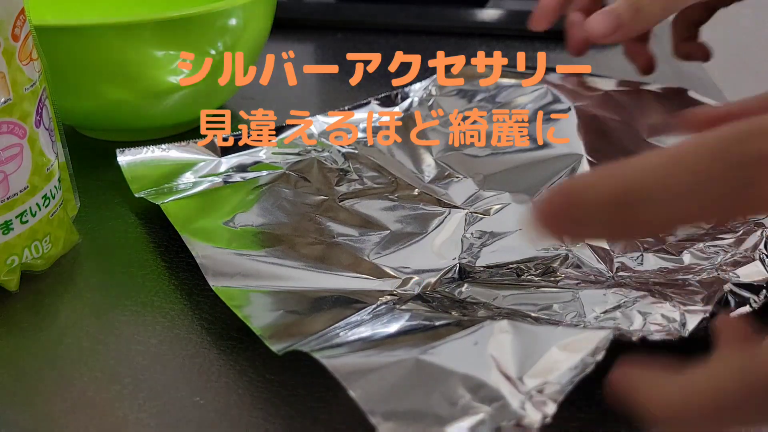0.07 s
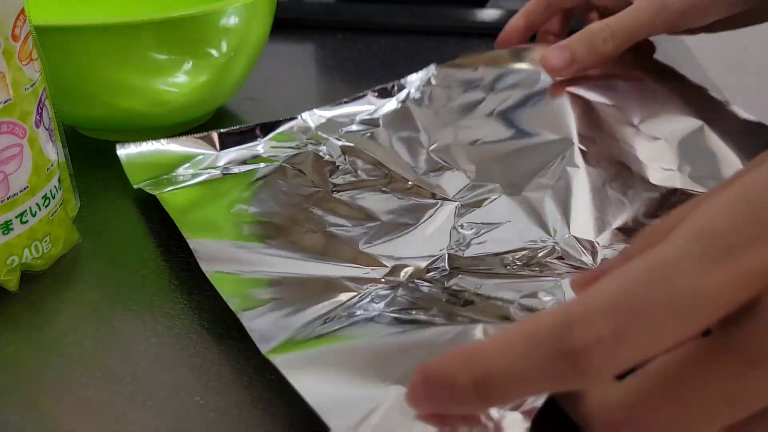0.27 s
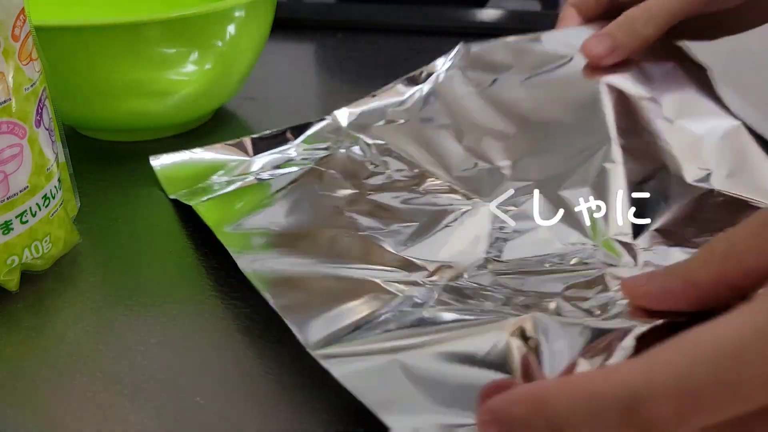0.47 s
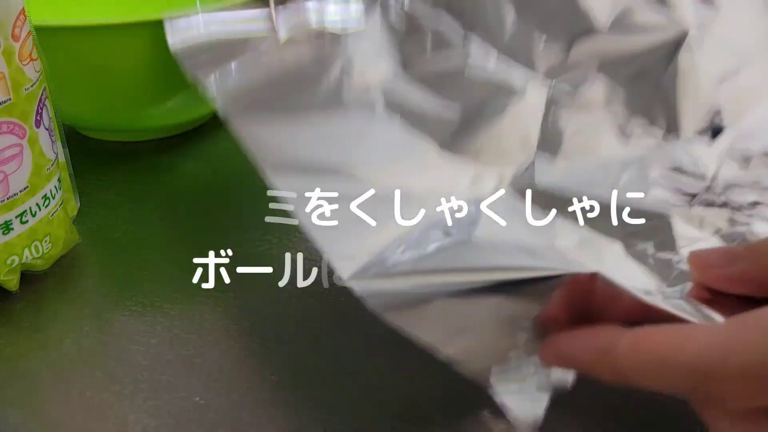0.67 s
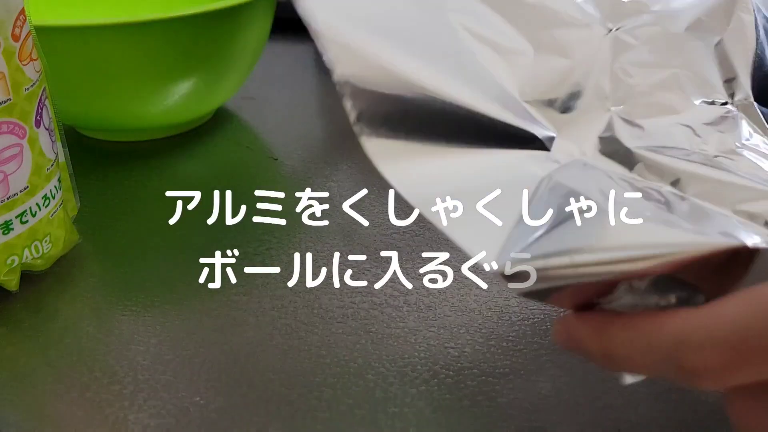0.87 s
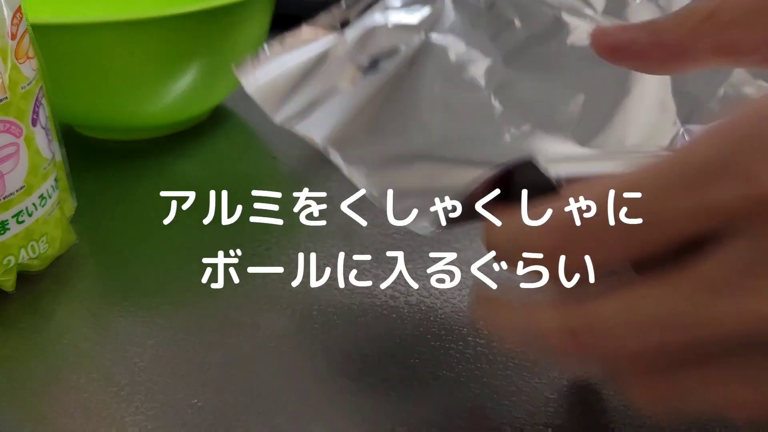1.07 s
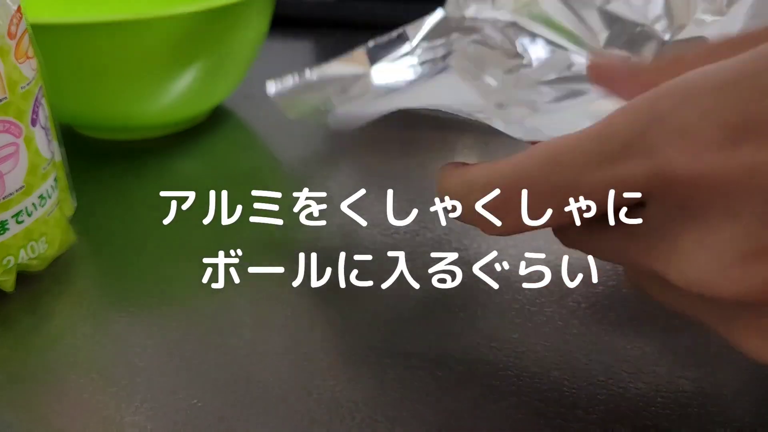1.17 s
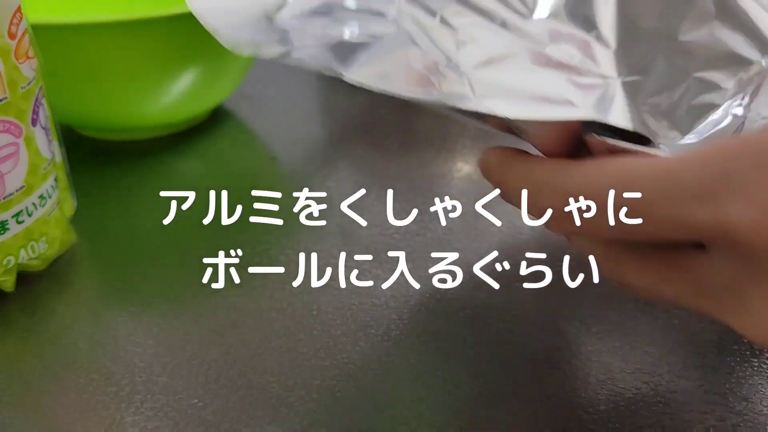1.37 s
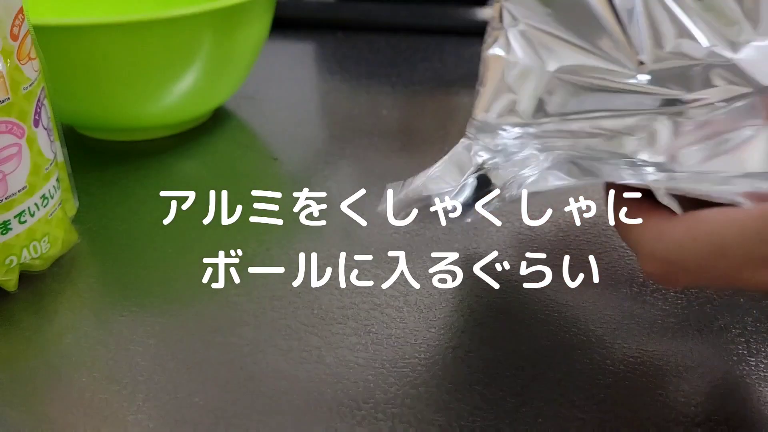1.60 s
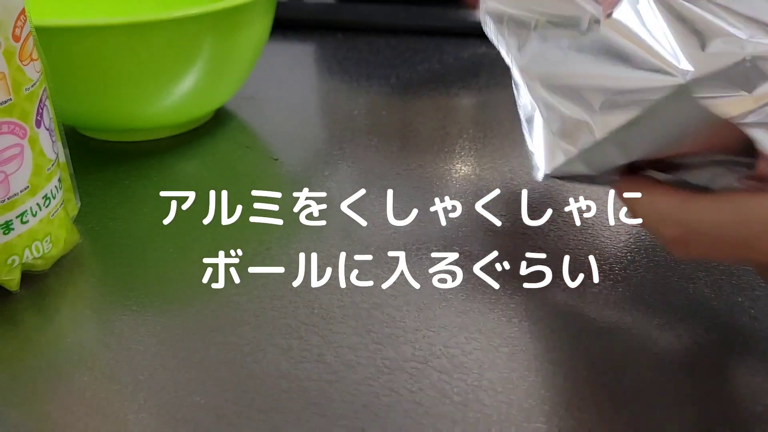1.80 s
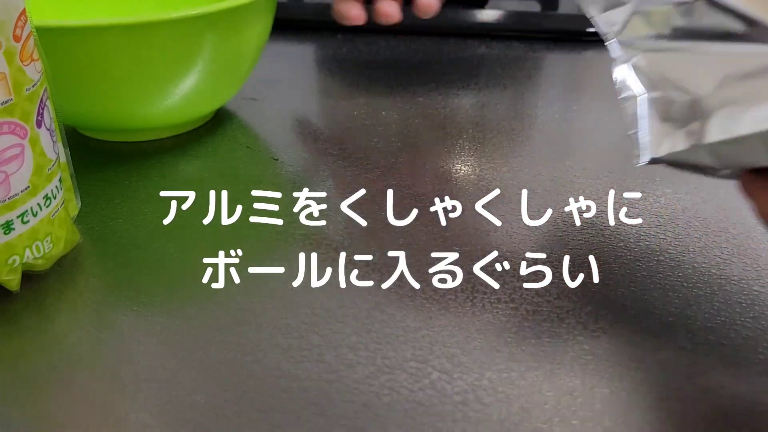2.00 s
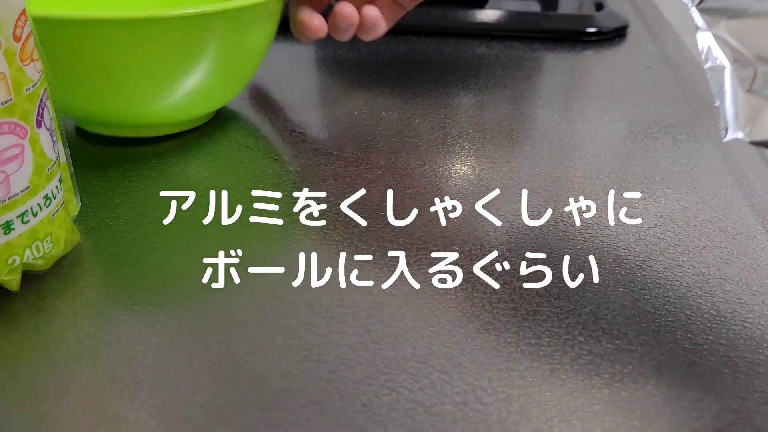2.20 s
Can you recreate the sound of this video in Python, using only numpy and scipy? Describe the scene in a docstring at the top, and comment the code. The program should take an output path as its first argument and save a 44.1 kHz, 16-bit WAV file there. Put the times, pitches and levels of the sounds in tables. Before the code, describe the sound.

Aluminium foil crinkles and crackles as hands crumple it in a quiet room.

```python
"""Crumpling aluminium foil

Two hands gather a sheet of foil, crumple it and lift it off a table in a small, quiet room.
Each squeeze sets off a swarm of tiny creases, single flat patches snap through louder, and the
whole sheet bends with a low flutter. The foil rings briefly and the room echoes. Underneath,
the table rumbles under the hands, ventilation blows and an appliance hums."""
import sys
import numpy as np
from scipy import signal
from scipy.fft import rfft, irfft
from scipy.io import wavfile
from scipy.ndimage import uniform_filter1d

SR = 44100
rng = np.random.default_rng(int(sys.argv[2]) if len(sys.argv) > 2 else 0)


def int16_out(signal):
    """Quantize to a 16-bit WAV file."""
    q = np.round(np.clip(np.atleast_2d(signal).T, -1, 1) * 32767)
    wavfile.write(sys.argv[1], SR, q.astype(np.int16))


N = 99225

# Tone of the ventilation: pitch_hz, gain_db
AIR_TONE = [(15, -50), (25, -16), (60, -13), (105, -6.5), (170, -16.5), (215, -6.5), (291, -6),
            (400, -10.5), (480, -15.5), (540, -16.5), (620, -16), (1060, -25.5), (1800, -25), (2400, -29),
            (3500, -30.5), (8000, -43.5), (15800, -47)]
# How alike the ventilation is on the left and right: pitch_hz, correlation
AIR_LIKENESS = [(40, 0.33), (130, 0.97), (280, 0.62), (600, 0.083), (3000, 0.021)]
# Tones of the appliance: pitch_hz, level_db
HUM_TONES = [(120, -60), (292, -61)]
# Time the room's echo takes to fade by 60 dB: pitch_hz, fade_s
ROOM_FADE = [(200, 0.11), (1000, 0.22), (3500, 0.33), (9000, 0.17), (16000, 0.12)]
# Hands shifting on the table: start_s, length_s, level_db
HAND_PUSHES = [(0.173, 0.058, -57), (.59, 0.082, -59), (0.807, 0.27, -49), (1.212, .17, -50),
               (1.504, 0.055, -50), (1.626, 0.29, -51.5), (1.97, 0.41, -61)]
# Tone of the table top: pitch_hz, gain_db
TABLE_TONE = [(20, -20), (45, -12), (75, 0), (105, 2), (119, 15), (140, -7.5), (190, -9), (400, -30)]
# How strongly the whole sheet bends: time_s, relative_level_db
BEND_LEVELS = [(.17, -69), (.21, -55.5), (.31, -57.5), (.38, -57), (.47, -59), (0.579, -58), (.65, -53),
               (.7, -76), (.8, -53), (.86, -47.5), (.93, -48), (.97, -42), (1.03, -60), (1.12, -55),
               (1.21, -64), (1.27, -48), (1.36, -59), (1.46, -62), (1.54, -48), (1.64, -67), (1.68, -44.5),
               (1.82, -51.5), (1.9, -62), (1.96, -70)]
# Tone of the bending: pitch_hz, gain_db
BEND_TONE = [(60, -26), (160, -7.5), (215, -1), (340, 1.5), (520, 0), (640, -4.5), (900, -5.5), (1600, -31),
             (5000, -57)]
# Notes the foil rings at, each fading by 60 dB: pitch_hz, gain_db, fade_s
FOIL_NOTES = [(1716, -22, 0.18), (1849, -22.5, 0.21), (2830, -24, 0.2), (3210, -22.5, 0.1),
              (5160, -24, 0.17)]
# Flat patches snapping through: start_s, level_db, pitch_hz, width_octaves, left_minus_right_db
PATCH_SNAPS = [(.1795, -49.5, 5000, 0.52, 1), (0.2368, -33, 5700, 0.69, 2), (.297, -43, 450, 0.56, 8),
               (.3325, -29, 3600, 0.78, 2.5), (0.4266, -32.5, 2160, 1.13, 1), (.537, -27, 5140, 1.3, -1.5),
               (.554, -49, 6000, 1.5, 0), (.556, -37, 1750, 0.17, -9), (0.5778, -32, 2410, 0.59, 0),
               (0.641, -35.5, 1800, 2, 4), (.646, -27, 2600, 1.5, 1), (.6462, -40, 865, 0.43, -3),
               (0.7153, -30, 3600, 1.4, -3), (0.749, -29, 2800, 1.5, -3), (.9205, -27.5, 10400, 0.48, 4),
               (0.9228, -28, 9000, .8, -5), (.9642, -28.5, 745, 0.41, -1), (0.965, -38, 1600, 0.49, -13),
               (0.9724, -28, 3800, 1.2, -2), (0.997, -31, 1820, 1.8, -3), (1.28, -45, 3000, 1.1, 0),
               (1.294, -33, 1930, 2, -14), (1.315, -24, 4500, 3.1, 1), (1.362, -30, 6000, 2.9, -9),
               (1.3753, -35, 2920, 1.2, 5), (1.381, -40, 1140, 1.2, -3), (1.406, -44, 4000, 1.5, 0),
               (1.449, -30.5, 12700, .5, -3), (1.649, -27.5, 8000, 1.3, -1), (1.665, -39, 450, 0.57, 3),
               (1.688, -33, 8000, 1.2, -3), (1.692, -39, 435, 0.4, 2.5), (1.7518, -40, 7000, 1.3, 4),
               (1.8028, -28.5, 8000, 0.41, 0), (1.8557, -25.5, 5000, 2, -4), (1.903, -30.5, 8300, 0.81, 0),
               (1.9803, -29, 9700, 0.78, -2.5), (1.984, -34, 5500, 0.79, 0), (1.996, -39, 6500, 0.9, -1),
               (2.084, -51.5, 5500, 0.9, -12), (2.09, -56, 5000, 1.3, 14), (2.1844, -54.5, 3000, 0.47, -1),
               (2.217, -45.5, 2840, 0.17, -3), (2.2165, -46, 10000, 0.99, -5)]
# Squeezes of the hands: start_s, rise_s, hold_s, relative_level_db, brightness_db_per_octave
HAND_SQUEEZES = [(0, 0.0025, 0.04, -64, -7), (0.18, 0.031, 0.046, -35, 0.5),
                 (0.254, 0.0075, 0.053, -41.5, -1), (0.329, 0.0019, 0.022, -27.5, 0),
                 (0.368, 0.01, 0.058, -32.5, 0.5), (0.431, 0.049, 0.042, -33, -1),
                 (0.544, 0.005, 0.072, -33, -1.5), (0.646, 0.0053, 0.041, -31.5, 0.5),
                 (0.706, 0.019, .01, -22.5, 1.5), (.76, .005, 0.024, -28, 1.5),
                 (0.796, 0.024, 0.054, -32.5, -2.5), (0.833, 0.034, 0.016, -22.5, 1.5),
                 (0.89, 0.036, 0.08, -27.5, -.5), (1.014, 0.008, .033, -29.5, 1),
                 (1.069, 0.027, 0.015, -33, -1), (1.128, 0.0098, 0.0041, -24, 1),
                 (1.149, 0.0043, 0.011, -21.5, 1), (1.18, 0.0037, 0.014, -30, -0.5),
                 (1.223, 0.011, 0.027, -28, -2.5), (1.254, 0.0097, 0.054, -28.5, -2),
                 (1.324, 0.009, 0.014, -30.5, 0), (1.357, 0.0037, .038, -25.5, -0.5),
                 (1.437, 0.018, 0.039, -38.5, -1), (1.478, 0.017, 0.056, -31.5, -.5),
                 (1.562, 0.0089, 0.047, -30, -0.5), (1.644, 0.0017, 0.0044, -34.5, 0),
                 (1.686, 0.0013, .012, -26.5, 1), (1.707, 0.014, .035, -25.5, 0.5),
                 (1.763, 0.025, 0.039, -29, -1), (1.825, .008, 0.041, -33, -1),
                 (1.871, .005, 0.019, -39.5, -3.5)]
# Tone of the creases: pitch_hz, gain_db
CREASE_TONE = [(250, -24), (500, 0), (680, -6.5), (950, -3.5), (1750, -1.5), (2200, -3), (3150, 0.4),
               (4500, -0.9), (8900, 0.5), (10900, -2.5), (13300, 2.5), (15800, -2)]
# Balance between the two microphones: pitch_hz, left_minus_right_db
MIC_BALANCE = [(60, 0), (130, 0.5), (260, -3.5), (500, -2.5), (1500, -0.5), (4000, .5)]


def amp(db):
    """Turns decibels into a gain."""
    return 10 ** (np.asarray(db) / 20)


def unit_rms(x):
    """Scales a sound to an average (rms) level of 1."""
    return x / np.sqrt(np.mean(x ** 2) + 1e-20)


def unit_energy(x):
    """Scales each channel to an energy of 1."""
    return x / np.sqrt(np.sum(x ** 2, -1, keepdims=True) + 1e-20)


def look_up(table, hz):
    """Reads between a table's rows on a logarithmic pitch scale."""
    pitches, values = np.transpose(table)
    return np.interp(np.log(hz + 1), np.log(pitches + 1), values)


def add(mix, start_s, sound):
    """Mixes a stereo sound in at the given time."""
    part = mix[:, max(round(start_s * SR), 0):][:, :sound.shape[1]]
    part += sound[:, :part.shape[1]]


def shape_tone(x, table):
    """Turns each pitch up or down as a tone table says."""
    return irfft(rfft(x) * amp(look_up(table, np.fft.rfftfreq(N, 1 / SR))), N)


def resonate(x, hz, octaves):
    """A broad resonance favours pitches near hz; the result has an energy of 1."""
    pitches = abs(np.fft.fftfreq(x.shape[1], 1 / SR)) + 1
    log_gain = np.maximum(-0.5 * (np.log2(pitches / hz) / octaves) ** 2, -8)
    response = np.exp(np.conj(signal.hilbert(log_gain)))  # rings after a hit, not before
    return unit_energy(np.fft.ifft(np.fft.fft(x) * response).real)


def changing_echo(x, make_echo, step_s=0.06):
    """Each overlapping slice of sound gets a new echo, as the foil changes shape and place."""
    out, hop = np.zeros((2, N)), round(step_s * SR)
    padded = np.pad(x, ((0, 0), (0, 2 * hop)))
    window = np.sin(np.pi * np.arange(2 * hop) / (2 * hop))
    for at in range(0, N, hop):
        piece = padded[:, at:at + 2 * hop] * window
        add(out, at / SR, signal.fftconvolve(piece, make_echo(), axes=1))
    return out


def ventilation(level_db=-52):
    """Moving air makes a low, steady rush."""
    left, other = rfft(rng.standard_normal((2, N)))
    alike = look_up(AIR_LIKENESS, np.fft.rfftfreq(N, 1 / SR))
    right = alike * left + np.sqrt(1 - alike ** 2) * other
    return amp(level_db) * unit_rms(shape_tone(irfft([left, right], N), AIR_TONE))


def appliance_hum(waver_depth=0.15, drift_radians=0.48):
    """An appliance hums with low tones that waver a little in level and pitch."""
    t, out = np.arange(N) / SR, np.zeros(N)
    for hz, db in HUM_TONES:
        noise = rng.standard_normal((2, N))
        waver, drift = unit_rms(uniform_filter1d(uniform_filter1d(noise, 4000), 4000))
        tone = np.sin(2 * np.pi * hz * t + drift_radians * drift)
        out += amp(db) * unit_rms((1 + waver_depth * waver) * tone)
    return out


def room_echo(x, gain_db=-3.5, rise_s=0.0051, samples=12000):
    """The small room answers with a short wash of sound that lasts longest near 3500 Hz."""
    def tail():
        hz, t, spectrum = signal.stft(rng.standard_normal((2, samples)), SR, nperseg=256)
        fade = amp(-60 * t / look_up(ROOM_FADE, hz)[:, None])
        echo = signal.istft(spectrum * fade, SR, nperseg=256)[1]
        rise = np.minimum(np.arange(echo.shape[1]) / SR / rise_s, 1)
        return unit_energy(echo * rise)
    return amp(gain_db) * changing_echo(x, tail)


def table_rumble():
    """The table top rumbles dully as the hands shift on it."""
    t = np.arange(N) / SR
    push = sum(amp(db) * np.sin(np.pi * np.clip((t - start_s) / length_s, 0, 1))
               for start_s, length_s, db in HAND_PUSHES)
    return push * unit_rms(shape_tone(rng.standard_normal(N), TABLE_TONE))


def foil_bending(knocks_per_s=600, gain_db=-2.5, shared=0.78):
    """Wide panels give soft, low knocks as the sheet bends and drags on the table."""
    times, levels = np.transpose(BEND_LEVELS)
    level_db = np.interp(np.arange(N) / SR, times, levels, left=-100, right=-100)
    knocks = (rng.random((3, N)) < knocks_per_s / SR) * rng.standard_normal((3, N))
    stereo = np.sqrt(shared) * knocks[2] + np.sqrt(1 - shared) * knocks[:2]
    return unit_rms(shape_tone(stereo, BEND_TONE)) * amp(gain_db + level_db)


def foil_ring(x, wash_fade_s=0.054, wash_db=-0.5, samples=6000):
    """Every buckle spreads through the foil: a short, noisy wash and a few longer notes."""
    t = np.arange(samples) / SR

    def ring():
        wash = rng.standard_normal((2, samples)) * amp(-60 * t / wash_fade_s)
        out = amp(wash_db) * unit_energy(wash)
        for hz, db, fade_s in FOIL_NOTES:
            note = np.sin(2 * np.pi * (hz * t + rng.random((2, 1))))
            out += amp(db) * unit_energy(note * amp(-60 * t / fade_s))
        return out
    return changing_echo(x, ring)


def one_snap(hz, octaves, decay_s=0.0027, pulse=0.28, alike_below_hz=2470, samples=1024):
    """A flat patch flips: a sharp pulse and a burst of noise that dies within milliseconds."""
    fade = np.exp(-np.arange(samples) / SR / decay_s)
    shared = np.exp(-hz / alike_below_hz)  # low snaps reach both microphones alike
    noise = rng.standard_normal((3, samples))
    burst = unit_energy((np.sqrt(1 - shared) * noise[:2] + np.sqrt(shared) * noise[2]) * fade)
    burst[0, 0] += pulse
    burst[1, 2] += pulse  # two samples later on the right
    toneless = irfft(np.exp(1j * np.angle(rfft(burst))), samples)  # all pitches equally strong
    return resonate(toneless * np.sqrt(fade), hz, octaves)


def foil_snaps(body_s=0.0017):
    """Larger patches flip one at a time, each with the energy of its level held for body_s."""
    out = np.zeros((2, N))
    for start_s, db, hz, octaves, side_db in PATCH_SNAPS:
        gains = amp([[db + side_db / 2], [db - side_db / 2]]) * np.sqrt(body_s * SR)
        add(out, start_s, gains * one_snap(hz, octaves))
    return out


def foil_creases(creases_per_s=3600, decay_s=0.00065, release_s=0.017, spread_db=2, gain_db=-4.5):
    """Each squeeze buckles the foil in a swarm of tiny clicks; tight squeezes sound brighter."""
    t, out = np.arange(N) / SR, np.zeros((2, N))
    squeezes = []
    for start_s, rise_s, hold_s, _, _ in HAND_SQUEEZES:
        grip = np.clip((t - start_s) / rise_s, 0, 1)
        let_go = np.exp(-np.maximum(t - start_s - rise_s - hold_s, 0) / release_s)
        squeezes.append(grip * let_go)
    level_db, brightness = np.transpose(HAND_SQUEEZES)[3:]
    pitches = np.geomspace(800, 18000, 16)
    for hz in pitches:
        chance = np.sqrt(hz) / np.sqrt(pitches).sum() * creases_per_s / SR
        clicks = (rng.random(N) < chance) * amp(spread_db * np.minimum(rng.exponential(1, N), 3))
        # Each click gets a quickly fading tail.
        click_power = signal.lfilter([1], [1, -np.exp(-2 / (decay_s * SR))], clicks ** 2 + 1e-12)
        strengths = amp(level_db + brightness * np.log2(hz / 7000))  # tips the tone around 7000 Hz
        effort = np.sqrt(strengths ** 2 @ np.square(squeezes) * hz / pitches.sum())
        bursts = unit_rms(np.sqrt(click_power)) * effort * rng.standard_normal((2, N))
        ring = resonate(signal.unit_impulse(512)[None], hz, octaves=0.92)
        out += signal.fftconvolve(bursts, ring, axes=1)[:, :N]
    return amp(gain_db) * shape_tone(out, CREASE_TONE)


def scene():
    """The foil, its ring and its echo, over the table and the background."""
    buckles = foil_creases() + foil_snaps()
    direct = buckles + foil_bending()
    foil = direct + foil_ring(buckles) + room_echo(direct)
    return foil + table_rumble() + ventilation() + appliance_hum()


def record(dry, cutoff_hz=15900):
    """The right microphone hears more of the lower middle pitches; the highest treble is cut."""
    left = shape_tone(dry[0], np.multiply(MIC_BALANCE, [1, 0.5]))
    right = shape_tone(dry[1], np.multiply(MIC_BALANCE, [1, -0.5]))
    treble_cut = signal.firwin(511, cutoff_hz, window=("kaiser", 9), fs=SR)
    return signal.oaconvolve(np.array([left, right]), treble_cut[None], "same")


dry = scene()
out = record(dry)
int16_out(out)
```